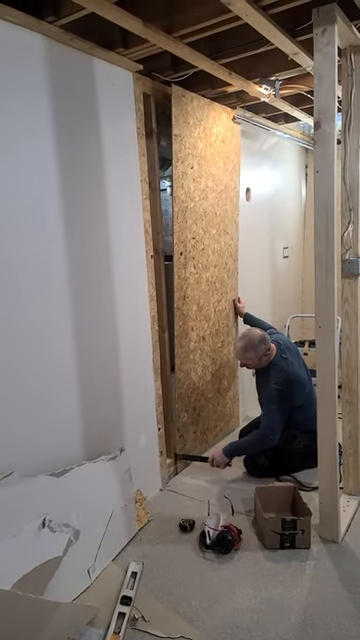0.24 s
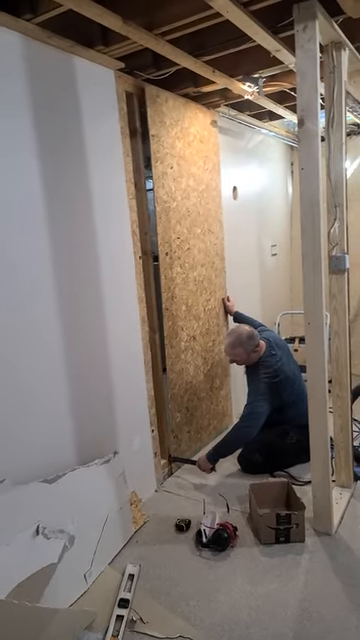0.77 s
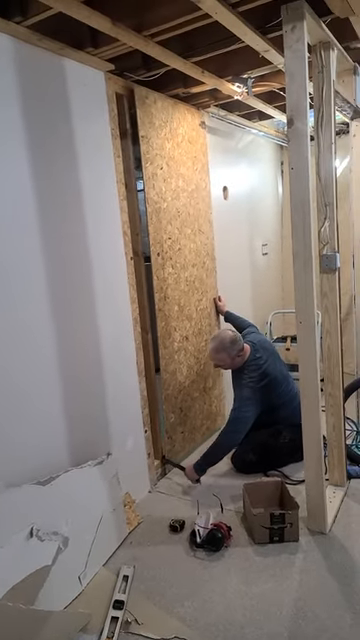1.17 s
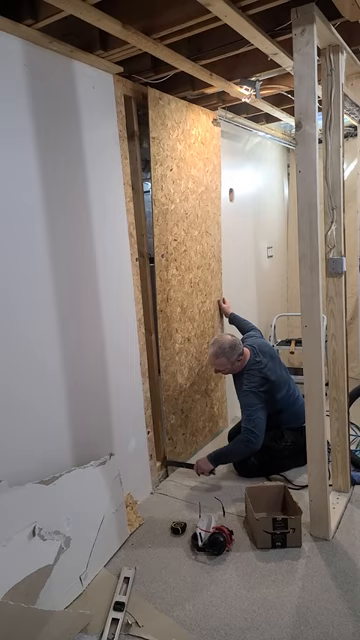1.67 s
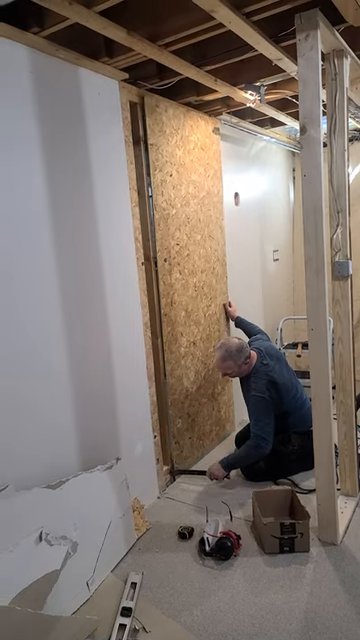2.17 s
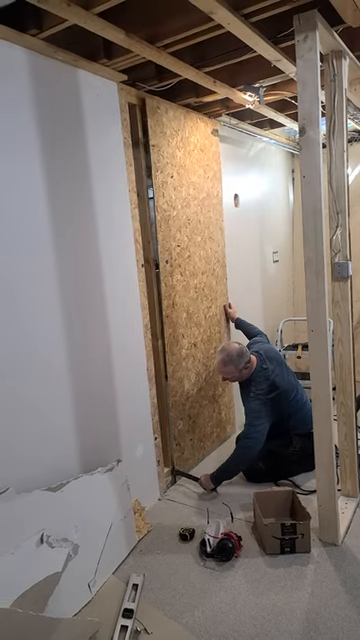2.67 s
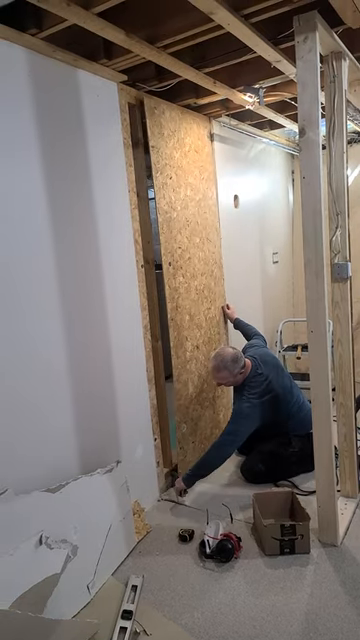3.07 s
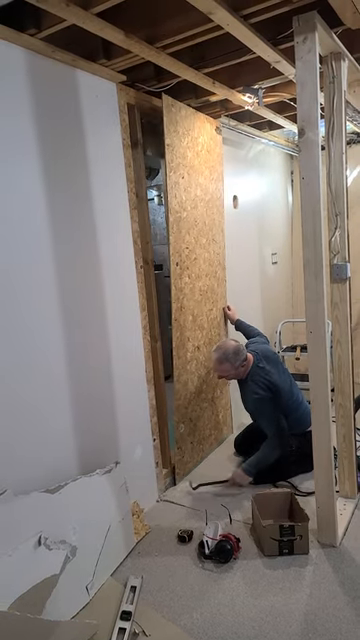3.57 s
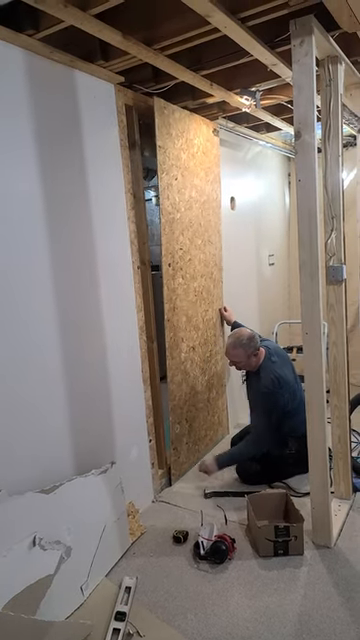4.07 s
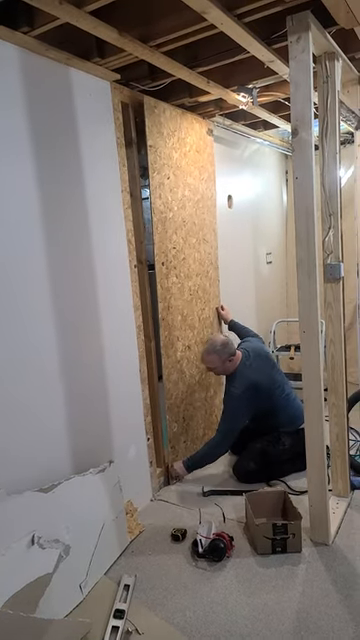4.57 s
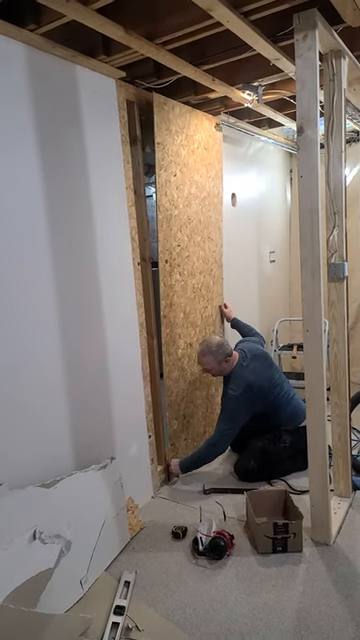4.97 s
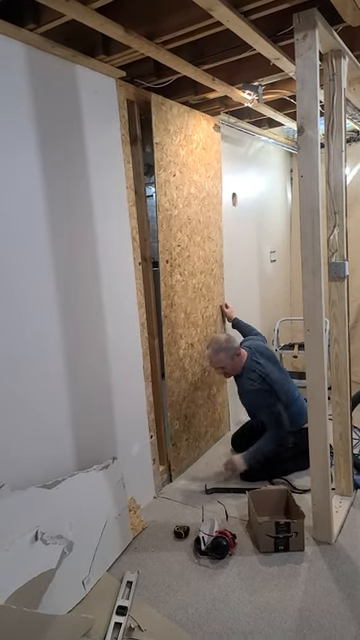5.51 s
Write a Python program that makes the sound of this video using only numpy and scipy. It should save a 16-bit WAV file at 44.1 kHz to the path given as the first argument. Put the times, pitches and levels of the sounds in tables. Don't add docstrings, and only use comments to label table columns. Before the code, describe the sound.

Gritty scrapes, sharp cracks and dull hollow knocks as a loose chipboard sheet is levered off studs, over faint low room hum.

```python
import sys
import numpy as np
from scipy import signal
from scipy.fft import rfft, irfft, next_fast_len
from scipy.io import wavfile
from scipy.ndimage import map_coordinates

SR = 44100
rng = np.random.default_rng(int(sys.argv[2]) if len(sys.argv) > 2 else 0)


def dump_mix(stems):
    frames = np.atleast_2d(stems).T
    limited = np.clip(frames, -1, 1)
    pcm = np.round(limited * 32767).astype(np.int16)
    wavfile.write(sys.argv[1], SR, pcm)


def volts_from_db(level):
    exponent = np.asarray(level, float) / 20
    return 10 ** exponent


N = 253398


def unit(x):
    return x / np.sqrt(np.mean(x ** 2) + 1e-20)


def along(points, hz):
    f, v = np.transpose(points)
    return np.interp(np.log(hz + 1), np.log(f + 1), v)


def curves(rows):
    s, *cols = np.transpose(rows)
    return [np.interp(np.arange(N) / SR, s, c) for c in cols]


def wobble(rate):
    knots = rng.standard_normal(int(N * rate / SR) + 4)
    return map_coordinates(knots, [np.arange(N) * rate / SR])


def filtered(x, response):
    n = x.shape[-1]
    m = next_fast_len(n + 4096)
    return irfft(rfft(x, m) * response(np.fft.rfftfreq(m, 1 / SR)), m)[..., :n]


def peak(f, hz, width_hz):
    return 1j * f * width_hz / (hz * hz - f * f + 1j * f * width_hz)


def add(track, s, sound):
    part = track[max(round(s * SR), 0):][:len(sound)]
    part += sound[:len(part)]


# (frequency [Hz], likeness [0-1])
ALIKE = [(60, .99), (150, .975), (300, .86), (640, .45), (1400, 0), (15000, 0)]


def blend(two, gain):
    def turn(f):
        return np.arccos(along(ALIKE, f)) / 2
    mid, side = filtered(two, lambda f: gain(f) * [np.cos(turn(f)), np.sin(turn(f))])
    return np.array([mid + side, mid - side])


def pair(spectrum):
    return unit(blend(rng.standard_normal((2, N)), lambda f: volts_from_db(along(spectrum, f))))


def grains(spectrum, share, spread_db):
    size_db = spread_db * np.minimum(rng.exponential(size=N), 4)
    clicks = (rng.random(N) < share) * rng.standard_normal(N) * volts_from_db(size_db)
    return unit(filtered(clicks, lambda f: volts_from_db(along(spectrum, f))))


def contact(burst, edge, ring_hz, wood_db, air_db):
    def body(f):
        touched = peak(f, ring_hz, 0.42 * ring_hz)
        broad = 0.53 * peak(f, 900 + 0.74 * ring_hz, 2.2 * ring_hz) ** 2
        wood = volts_from_db(wood_db + 7.5) * peak(f, 1036, 2940) ** 2
        return touched + broad + wood
    air = filtered(edge, lambda f: peak(f, 10200, 3500) ** 2)
    return filtered(burst, body) + volts_from_db(air_db) * air


# (time [s], pitch [Hz], length [s], level [dB])
GROAN = (0.009, 338.5, 0.068, -43)


def panel_hum():
    out = np.zeros(N)
    s, hz, length, db = GROAN
    u = np.linspace(0, 1, int(length * SR))
    fade = np.minimum(1, 15 * np.minimum(u, 1 - u))
    add(out, s, volts_from_db(db - 4.0 * u) * fade * np.sin(2 * np.pi * hz * length * u))
    return out


# (time [s], pitch [Hz], level [dB])
SQUEAL = [
    (0, 1790, -54),
    (.012, 1700, -53.5),
    (.042, 1523, -59),
    (.047, 1530, -58),
    (.053, 1740, -53),
    (.057, 1740, -50),
    (.066, 1590, -53),
    (.076, 1480, -55),
    (.087, 1420, -57),
]
# (multiple of pitch, level [dB])
OVERTONES = [(.5, -16), (1, 0), (1.5, -20), (2, -6), (2.5, -15), (3, -16), (4, -24)]


def squeak():
    pitch_hz, db = curves(SQUEAL)
    t = np.arange(N) / SR
    turns = np.cumsum(pitch_hz) / SR
    release = np.clip((SQUEAL[-1][0] - t) / .004, 0, 1)
    shake = 1 + .35 * np.sin(2 * np.pi * GROAN[1] * t)
    tone = sum(volts_from_db(level) * np.sin(2 * np.pi * k * turns) for k, level in OVERTONES)
    return release * shake * volts_from_db(db + 5.5) * tone


# (time [s], speed level [dB], left-right place [dB])
DRAG = [(0, -56, 5), (.12, -75, -5.5), (.34, -70.5, -2.5), (.6, -88.5, -3), (1.18, -82, -7.5),
        (1.32, -67, -7), (1.55, -64, -3), (1.69, -45.5, -6), (1.78, -68.5, -1), (1.9, -79, -5),
        (2.45, -90, -5.5), (3.0, -94, -4), (3.2, -65, -6.5), (3.55, -61.5, -3.5), (4.06, -82, -3.5),
        (4.65, -92, -2.5), (5.2, -80, -6.5), (5.74, -100.5, 0.5)]
# (time [s], level [dB])
LOAD = [(0, -56), (.4, -61.5), (.6, -66), (1.1, -80.5), (1.35, -70), (1.75, -62.5), (2.35, -75),
        (2.75, -74), (2.88, -75.5), (3.2, -67), (3.4, -55), (3.63, -63.5), (3.8, -74.5), (4.05, -66.5),
        (4.23, -61), (4.85, -77), (5.2, -73.5), (5.74, -72)]
# (frequency [Hz], level [dB per Hz])
GRIT = [(1180, -27), (2000, -11.5), (2280, -27.5), (2920, 0.5), (4040, -5.5), (5540, -4.5), (8590, -7),
        (9970, -6.5), (15100, -8.5), (16300, -30)]
# (frequency [Hz], level [dB per Hz])
RUB = [(290, -37), (500, -21), (784, 9), (884, 3.5), (1230, 5), (2290, -5.5), (3000, -4), (3900, -7),
       (6600, -120)]


def scrape():
    grit_db, load_db = curves(DRAG)[0], curves(LOAD)[0]
    mean_db = load_db.mean()
    rub_db = mean_db + 0.9 * (load_db - mean_db) - 11.5
    jerk = wobble(40)
    grit_gain = volts_from_db(grit_db - 4.5 + 3.5 * jerk + 2.2 * wobble(120))
    grit = grit_gain * grains(GRIT, share=0.03, spread_db=2)
    rub = volts_from_db(rub_db + 4.63 * jerk) * grains(RUB, share=.2, spread_db=-1.5)
    return grit + rub


# (peak time [s], level [dB], 10 dB rise [s], 10 dB fall [s])
HEAVES = [(.25, -56, 0.71, 0.2), (.54, -46, 0.067, 0.13), (1.84, -62.5, 0.9, .6),
          (2.43, -57.5, 0.027, 0.14), (2.78, -45, 0.08, 0.093), (3.0, -61.5, 0.11, 0.43),
          (3.49, -41, 0.08, 0.059), (3.55, -32, 0.04, 0.013), (3.63, -35.5, 0.047, 0.16),
          (3.95, -61, .2, .2), (4.14, -37, 0.057, 0.073), (4.3, -57.5, 0.067, 0.63),
          (5.3, -52.5, 0.13, 0.043), (5.45, -40, 0.041, 0.27)]
# (frequency [Hz], level [dB per Hz])
BOOM = [(11, -13), (18, 0), (65, 1.5), (90, -8.5), (123, -19), (140, -13.5), (180, -35), (310, -120)]
# (frequency [Hz], level [dB per Hz])
DRONE = [(71, -49), (120, -9), (193, -9.5), (225, -5), (294, -8), (367, 0), (453, -5.5), (541, -21),
         (650, -9.5), (840, -16.5), (1430, -120)]


def flex():
    t = np.arange(N) / SR
    swing = np.zeros(N)
    for s, db, rise, fall in HEAVES:
        tens = np.where(t < s, (s - t) / rise, (t - s) / fall)
        swing += volts_from_db(db - 10 * tens)
    boom = volts_from_db(-7.5) * swing * pair(BOOM)
    drone = volts_from_db(curves(LOAD)[0] - 0.5 + 3.56 * wobble(25.03)) * pair(DRONE)
    return boom + drone


# (frequency [Hz], level [dB per Hz])
HUSH = [(12, -20), (20, -8), (48, -3.5), (79, 1.5), (159, -23), (287, -7.5), (380, -9.5), (579, -16),
        (766, -18), (2290, -24), (4750, -26), (7860, -44.5), (11600, -31), (15000, -46), (16300, -46)]


def house_hum():
    return volts_from_db(-67.5 + 0.11 * wobble(2.9)) * pair(HUSH)


# (peak time [s], peak level [dB], centre [Hz], wood level [dB], rise [s])
CRUNCHES = [(.089, -40, 1700, 0, 0.0049), (.16, -25.5, 2700, -39, 0.012), (0.176, -32, 2530, -31, 0.0099),
            (0.254, -37, 5430, -19, 0.0083), (.285, -25, 2630, -32, 0.014),
            (0.2961, -33, 2880, -15, 0.0071), (0.3336, -45, 2170, 1, 0.004),
            (1.659, -21.5, 4600, -16.5, 0.007), (1.679, -22.5, 3480, -16, 0.008),
            (1.717, -39, 2570, -15, 0.0079), (2.0141, -41.5, 2210, -6, 0.0036),
            (2.1564, -28, 5470, -16, 0.0078), (2.184, -39, 3130, -9.5, 0.027),
            (2.2264, -43, 4900, -12, .014), (2.2514, -44.5, 6800, 1.5, 0.0069),
            (2.616, -35.5, 4120, -8, 0.014), (2.6447, -31.5, 2370, -4, 0.015),
            (3.4196, -20.5, 5600, -11, 0.0069), (3.445, -39, 5600, -15, .012),
            (3.465, -35.5, 8000, -2, 0.0059), (3.6124, -25.5, 5630, -14, 0.0066),
            (3.64, -41, 6000, -12, .015), (4.114, -43.5, 3580, -3, 0.02), (5.2153, -44.5, 3110, -10, 0.015)]
# (peak time [s], peak level [dB], centre [Hz])
SCUFFS = [(2.9772, -51.5, 7300), (3.1383, -50.5, 8440), (3.222, -48.5, 8430), (3.284, -46, 8460),
          (3.849, -57, 4190), (3.885, -55.5, 6400), (4.0346, -48, 4020), (4.762, -51, 5670),
          (4.868, -51, 5860), (4.95, -57.5, 4660), (5.29, -53.5, 5160), (5.324, -59, 5300),
          (.012, -50, 9000), (.042, -58, 9500), (3.383, -35, 5800), (3.706, -37, 8100), (5.271, -61, 5300),
          (5.308, -58, 5100), (5.345, -65, 5230), (5.43, -62, 6600), (5.468, -50.5, 5500),
          (5.495, -50, 5000), (5.171, -50.5, 5000), (1.959, -53.5, 7000), (2.402, -43.5, 4460),
          (2.819, -53, 4970)]


def crunches():
    out, t = np.zeros(N), np.arange(-SR // 20, SR // 8) / SR
    scuff_wood_db, scuff_rise_s = -10, 0.013
    scuffs = [(*r, scuff_wood_db, scuff_rise_s) for r in SCUFFS]
    for s, db, centre_hz, wood_db, rise in list(CRUNCHES) + scuffs:
        swell = np.exp(-(t / max(rise, .002)) ** 2 * np.where(t < 0, 1, .45))
        size_db = 3.5 * np.minimum(rng.exponential(size=len(t)), 4)
        cracks = swell * rng.standard_normal(len(t)) * volts_from_db(size_db)
        air_db = -15 + 11 * np.log2(centre_hz / 4500)
        add(out, s + t[0], volts_from_db(db - 20.5) * contact(cracks, cracks, centre_hz, wood_db, air_db))
    return out


# (time [s], peak level [dB], ring [Hz], wood level [dB])
SNAPS = [(0.1467, -28.5, 3000, -49), (1.017, -43.5, 3240, -14.5), (1.061, -46, 3680, -10),
         (1.4479, -42, 3900, -22), (1.566, -38.5, 4660, -23), (1.6265, -39, 5430, -32),
         (1.6384, -35, 5200, -37), (1.69, -25, 3580, -12.5), (1.7064, -24.5, 5600, -16),
         (1.8565, -39.5, 5130, -25), (2.133, -40.5, 3940, -20), (2.199, -40, 6000, -11),
         (2.217, -33.5, 4800, -19), (2.4024, -28.5, 3880, -19.5), (2.412, -41.5, 6550, -7.5),
         (2.601, -49, 4500, -32), (2.6325, -29, 3130, -7.5), (2.822, -39.5, 3350, -19.5),
         (3.603, -29.5, 5340, -21), (3.659, -37.5, 5240, -39), (3.7557, -39, 5100, -8),
         (4.0998, -34, 1460, -2), (5.4051, -42.5, 2280, -5), (5.511, -45.5, 1500, -3.5),
         (5.407, -43, 5350, -23), (5.507, -53, 5170, -20)]
# (time [s], peak level [dB], ring [Hz])
TICKS = [(0.8283, -59, 5230), (0.8727, -56.5, 8600), (1.0403, -54, 7040), (1.1351, -49.5, 6950),
         (1.192, -62, 3110), (1.296, -48, 2740), (1.318, -47, 5700), (1.3502, -46, 7200),
         (1.841, -54, 6160), (2.866, -50.5, 4500), (2.9296, -60, 7100), (3.0094, -62, 3250),
         (3.1193, -50.5, 8700), (3.497, -42, 5640), (3.558, -52, 7750), (3.7824, -62, 5380),
         (3.9514, -82, 5000), (4.812, -49, 5370), (2.823, -41, 6240), (4.1005, -36, 6860),
         (1.018, -46, 8950), (5.3674, -49.5, 6060)]


def snaps_and_ticks():
    out, t = np.zeros(N), np.arange(SR // 8) / SR
    snap_air_db, snap_t60_s = -53, 0.028
    tick_wood_db, tick_air_db, tick_t60_s = -20, -12, 0.029
    rows = [(*r, snap_air_db, snap_t60_s) for r in SNAPS]
    rows += [(*r, tick_wood_db, tick_air_db, tick_t60_s) for r in TICKS]
    for s, db, ring_hz, wood_db, air_db, t60 in rows:
        noise = rng.standard_normal(len(t))
        click = noise * volts_from_db(-60 * t / .003)
        crackle = noise * volts_from_db(-60 * t / t60) * (1 - np.exp(-t / 0.00039))
        edge = click + 0.16 * crackle
        add(out, s, volts_from_db(db - 3.5) * contact(click + crackle, edge, ring_hz, wood_db, air_db + 9.0))
    return out


# (time [s], peak level [dB])
SPIKES = [(1.061, -42.5), (1.5364, -52), (.1468, -38), (1.245, -64), (1.413, -63), (1.449, -51),
          (2.402, -41), (2.823, -45), (3.212, -48), (3.282, -60), (3.375, -52), (3.757, -50), (1.555, -44),
          (1.565, -40.5), (1.598, -42), (1.638, -39), (1.658, -39), (1.691, -30), (1.7065, -24.5),
          (1.7122, -30), (2.0105, -59), (2.156, -42), (1.715, -36), (2.413, -43), (3.117, -59),
          (3.497, -39), (3.611, -39), (3.6595, -34.5), (3.6038, -40), (5.433, -53), (5.46, -62)]


def splinters():
    out, t = np.zeros(N), np.arange(SR // 100) / SR
    t60_s, centre_hz, width_hz = 0.0035, 9200, 14000
    for s, db in SPIKES:
        add(out, s, volts_from_db(db + 5.5 - 60 * t / t60_s) * np.sign(rng.standard_normal(len(t))))
    return filtered(out, lambda f: peak(f, centre_hz, width_hz) ** 2)


# (time [s], pitch [Hz], level [dB], t60 [s])
RINGS = [(.155, 707, -42.5, 0.43), (.156, 1220, -41.5, 0.37), (.147, 3300, -35, 0.13),
         (0.159, 2670, -36, 0.16), (.158, 1992, -43.5, 0.29), (.158, 2466, -36, .14), (.16, 2966, -37, .18),
         (.158, 3203, -35, 0.16), (.15, 4300, -49, .2), (.152, 3500, -41, .12), (.288, 1184, -46.5, 0.13),
         (.292, 1723, -41, 0.12), (.286, 3100, -40.5, 0.22), (.29, 2800, -41, 0.14), (.29, 2466, -43, 0.13),
         (.29, 5523, -51, .06), (2.613, 4800, -44, .08), (2.638, 1400, -36, .08), (2.66, 1024, -41, 0.19),
         (2.66, 1300, -41, .1), (5.511, 1400, -49, .08), (5.512, 1900, -54, 0.044), (5.406, 1150, -52, .07),
         (2.66, 1900, -44, .08), (2.661, 720, -41, .1), (6.8, 2000, -49, .06), (.272, 990, -45.5, 0.094),
         (.277, 3220, -43, 0.078), (.148, 3100, -39, 0.066), (.148, 2000, -41, .06),
         (4.101, 1500, -38, 0.065), (4.102, 1150, -41, .07), (4.118, 1850, -46, .08),
         (.274, 2184, -42.5, 0.23), (.31, 1428, -49, 0.14), (1.017, 1120, -39, 0.011),
         (1.016, 3320, -47.5, 0.089), (1.061, 3550, -48.5, 0.073), (1.455, 3400, -51, 0.08),
         (2, 1100, -48, 0.021), (4.103, 2960, -43, 0.08), (5.406, 1490, -52, 0.19),
         (5.408, 1880, -51, 0.059), (5.408, 3700, -52, 0.028), (5.516, 1200, -57, 0.15)]


def bar():
    out, t = np.zeros(N), np.arange(SR // 3) / SR
    attack = 1 - np.exp(-t / 0.0009)
    for s, hz, db, t60 in RINGS:
        add(out, s, volts_from_db(db - 60 * t / t60) * attack * np.sin(2 * np.pi * hz * t))
    return out


# (time [s], peak level [dB], note [Hz], thump level [dB], clack level [dB])
KNOCKS = [(.156, -56, 400, 7, 21), (.301, -54, 208, 6, 9.5), (1.702, -50, 390, -22, 2),
          (2.16, -61, 162, -9, -17), (2.421, -64, 161, -5, 4), (2.634, -43.5, 326, -26, 3.5),
          (2.6595, -25, 359, -27, -3), (2.766, -56.5, 242, 3, -13), (3.477, -41.5, 159, 9.5, -43),
          (3.531, -50, 156, 4, -30), (3.627, -48, 195, -7, -31), (3.65, -48.5, 215, 3.5, -13),
          (4.0, -55.5, 341, -19, -22), (4.099, -35, 333, -10, 1.5), (4.125, -34, 365, -39, -14.5),
          (4.205, -34.5, 278, -30.5, -21.5), (4.217, -38.5, 319, -20, -41), (4.15, -44.5, 189, -5, -26),
          (4.24, -54, 185, -9.5, -35), (2.70, -48, 556, -25, 0), (5.165, -56, 354, -19, -7.5),
          (5.214, -59, 240, -20, -19), (5.403, -39.5, 183.5, 4.5, -11.5), (5.447, -50, 180, 16.5, -14),
          (5.507, -52, 196, 17.5, -0.5)]
# (frequency [Hz], width [Hz], level [dB])
CLACK = [(696, 40, 13), (1004, 120, 8.5), (1380, 300, 5), (2020, 1900, -6.5)]


def knocks():
    out, t = np.zeros(N), np.arange(SR // 3) / SR
    soft_t60_s, hard_db, choke = 0.085, -43.5, 0.46

    def face(f):
        return sum((-1) ** k * volts_from_db(db) * peak(f, hz, w) for k, (hz, w, db) in enumerate(CLACK))

    for s, db, note_hz, thump_db, clack_db in KNOCKS:
        t60 = soft_t60_s * volts_from_db(-choke * max(db - hard_db, 0))
        fade = volts_from_db(-60 * t / max(t60, .02)) * (1 - np.exp(-t / 0.00079))
        upper_hz = note_hz * rng.uniform(1.0, 1.293)
        note = np.sin(2 * np.pi * note_hz * t) + 0.43 * np.sin(2 * np.pi * upper_hz * t)
        thump = np.sin(2 * np.pi * rng.uniform(54.0, 74.0) * t) * volts_from_db(-60 * t / 0.14)
        clack = unit(filtered(rng.standard_normal(len(t)), face))
        struck = fade * (note + volts_from_db(clack_db - 3.0) * clack)
        add(out, s, volts_from_db(db + 1.0) * (struck + volts_from_db(thump_db - 3.5) * thump))
    return out


# (frequency [Hz], t60 [s])
ROOM = [(100, 0.4), (500, 0.18), (2000, 0.18), (6000, 0.18), (14000, 0.12)]


def room(x):
    out, step = np.zeros((2, N + SR)), SR // 5
    for start in range(0, N, step):
        hz, t, z = signal.stft(rng.standard_normal((2, SR // 3)), SR, nperseg=256)
        decay = volts_from_db(-60 * t / along(ROOM, hz)[:, None])
        tail = signal.istft(z * decay, SR, nperseg=256)[1]
        tail = tail / np.linalg.norm(tail[0])
        wet = signal.fftconvolve(x[None, start:start + step], tail, axes=1)
        out[:, start + 130:][:, :wet.shape[1]] += wet
    return out[:, :N]


def scene():
    bright = scrape() + snaps_and_ticks() + crunches()
    dull, tones, sharp = knocks(), bar(), splinters()
    squeal = squeak() + panel_hum()
    pan_db = curves(DRAG)[1]
    sides = volts_from_db([pan_db / 2, -pan_db / 2])

    def ports(x):
        return np.array([np.roll(x, 6), x])

    def walls(f):
        return volts_from_db(along([(100, -1.0), (400, 1.0), (1500, 5.5), (5000, 3.0), (12000, -0.5)], f))

    to_room = bright + dull + volts_from_db(-15) * (tones + squeal) + volts_from_db(-7) * sharp
    wet = blend(room(to_room), walls)
    near = sides * (ports(bright + tones + sharp) + volts_from_db(-2.5) * squeal)
    near = near + volts_from_db([[-1.1], [1.1]]) * ports(dull)
    return near + np.sqrt(sides) * wet + flex() + house_hum()


def roll_off(x):
    return signal.sosfilt(signal.butter(12, 16970, fs=SR, output="sos"), x)


def record(dry):
    def edge(f):
        return volts_from_db(np.interp(f, [15700, 15900, 16400, 16700], [0, -22, -28, -90]))
    mix = filtered(dry, edge)
    return roll_off(mix)


dry = scene()
out = record(dry)
dump_mix(out)
```